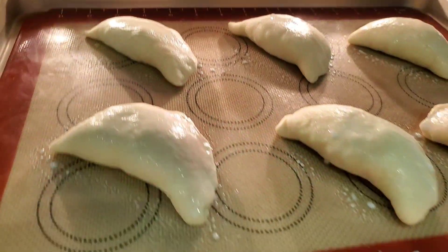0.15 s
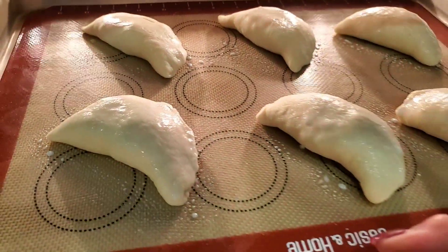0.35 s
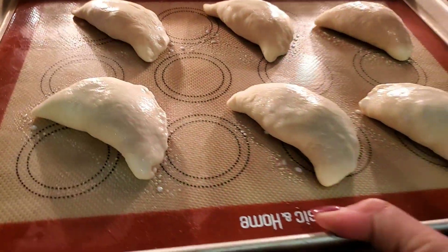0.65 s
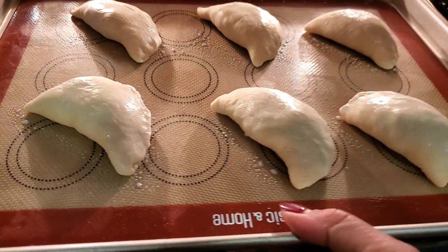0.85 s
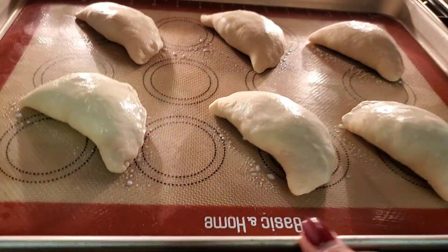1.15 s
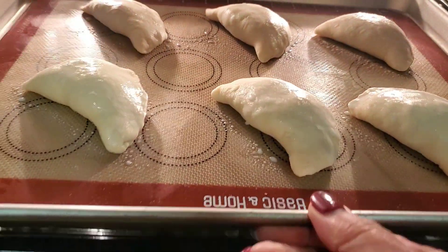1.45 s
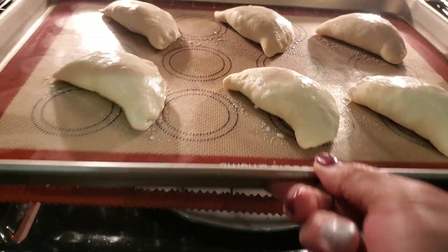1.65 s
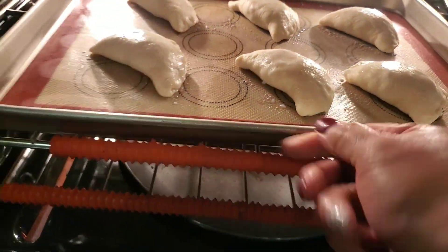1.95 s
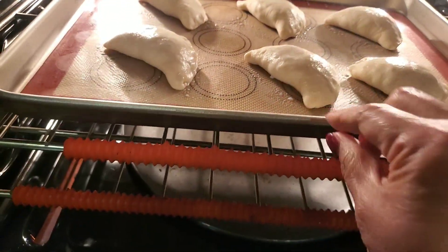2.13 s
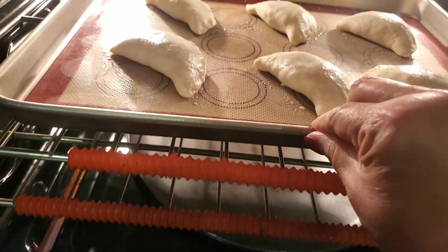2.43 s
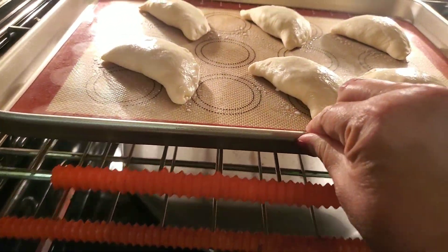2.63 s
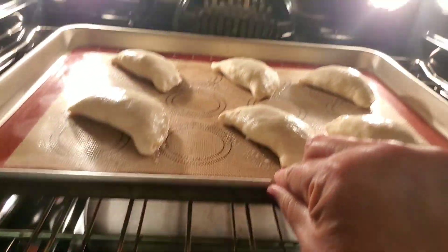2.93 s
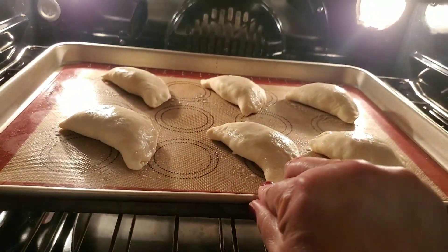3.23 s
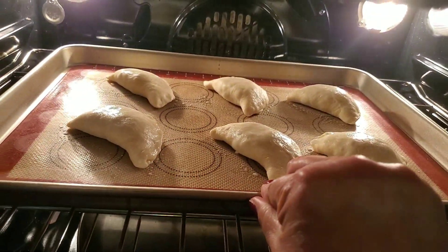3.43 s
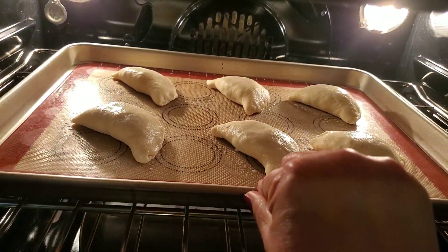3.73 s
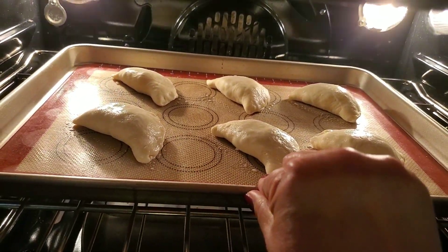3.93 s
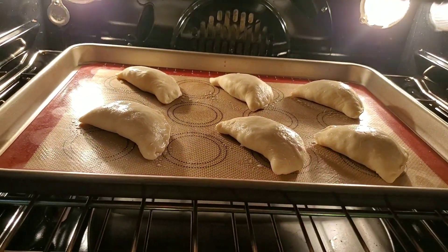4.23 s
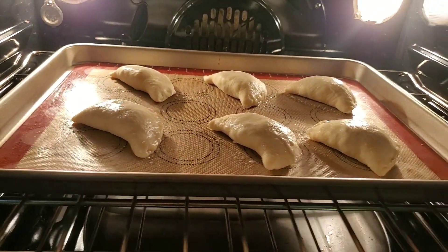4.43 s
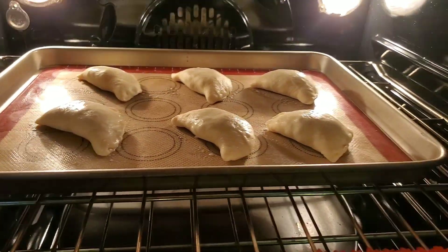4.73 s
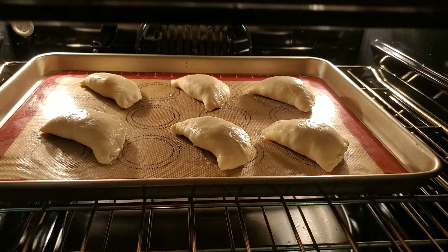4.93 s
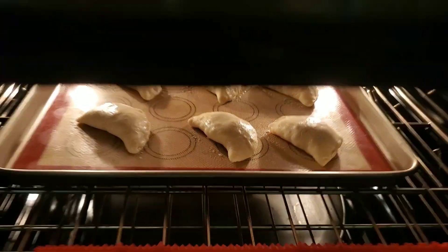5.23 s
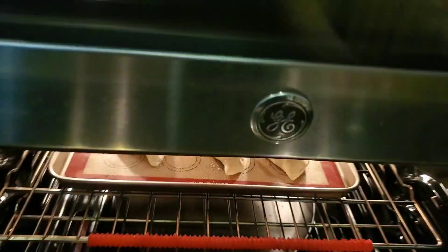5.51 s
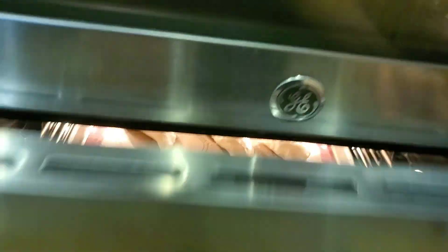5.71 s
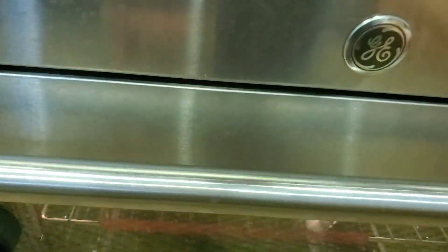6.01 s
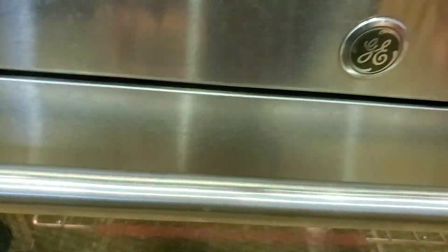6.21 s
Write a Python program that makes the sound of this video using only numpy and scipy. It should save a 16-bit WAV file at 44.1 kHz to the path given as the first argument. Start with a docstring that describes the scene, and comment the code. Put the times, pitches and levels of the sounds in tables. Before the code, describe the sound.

A close microphone at an oven's mouth in a small kitchen catches a steady low hum, rumbling air and a whirring fan leaning left. Right away a loaded metal baking sheet knocks the rack, and around 0.4 to 0.5 seconds it clatters loudly in a tight cluster of clanks that ring on with a wavering shimmer. Soft brushing, a faint rim squeak and dull nudges follow until 1.9. At 2.0 the sheet drops flat with a hard, bright clang, then paired wire ticks run from 2.1 to 2.7, with a dry click near 2.9. The drone dominates, broken by faint nudges at 3.7 and 4.7 and rack clicks around 4.9 to 5.0. Hinges knock at 5.4 and more strongly at 5.6, springs ringing. Near 6.0 the door slams with a heavy, overloaded thud and booming panels, rattles briefly, and settles in tiny hiss puffs over the muffled hum.

```python
"""An oven hums and whirrs throughout, its steady drone made of a sine, shaped noise and wavering noise bands.
A loaded baking sheet clatters onto the rack and drops flat: bursts of dense modes, with tuned modes ringing on.
It is pushed in with noise brushes, a squeak and paired wire ticks; then the rack clicks dryly.
The door's hinges knock and their springs ring; it shuts with a heavy thud over booming panels and settles in
puffs of hiss. A small kitchen answers the metal, and the loudest blows overload the close microphone."""
import sys
import numpy as np
from scipy import signal
from scipy.fft import rfft, irfft, next_fast_len
from scipy.io import wavfile
from scipy.ndimage import map_coordinates

SR = 44100
rng = np.random.default_rng(int(sys.argv[2]) if len(sys.argv) > 2 else 0)


def int16_out(signal):
    """Quantize to a 16-bit WAV file."""
    q = np.round(np.clip(np.atleast_2d(signal).T, -1, 1) * 32767)
    wavfile.write(sys.argv[1], SR, q.astype(np.int16))


N = 280828  # length of the scene in samples


def amp(db):
    """Decibels to amplitude."""
    return 10 ** (np.asarray(db) / 20)


def unit(x):
    """Scale to rms 1."""
    return x / np.sqrt(np.mean(x ** 2) + 1e-20)


def along(points, hz):
    """Read (frequency, value) points along a log frequency axis."""
    f, v = np.transpose(points)
    return np.interp(np.log(hz + 1), np.log(f + 1), v)


def curves(rows):
    """One value per sample for each column after the time."""
    s, *cols = np.transpose(rows)
    return [np.interp(np.arange(N) / SR, s, c) for c in cols]


def wobble(rate):
    """A smooth random curve with rate knots a second."""
    return map_coordinates(rng.standard_normal(1024), [np.arange(N) * rate / SR], mode="wrap")


def filtered(x, response):
    """Multiply the spectrum of x by a response of frequency."""
    n = x.shape[-1]
    m = next_fast_len(n + 2048, real=True)
    return irfft(rfft(x, m) * response(np.fft.rfftfreq(m, 1 / SR)), m)[..., :n]


def fade(x, decay):
    """Let each frequency of x die at its own speed."""
    hz, t, z = signal.stft(x, SR, nperseg=256)
    fall_db = -60 * t / along(decay, hz)[:, None]
    return signal.istft(z * amp(fall_db), SR, nperseg=256)[1][:, :x.shape[-1]]


def add(track, s, sound):
    """Lay a sound into a track at time s."""
    part = track[:, max(0, round(s * SR)):][:, :sound.shape[-1]]
    part += sound[:, :part.shape[-1]]


def swells(rows, rise_s, fall_s):
    """Envelope of strokes: each rises, holds to the end of its length, then falls 60 dB in fall_s."""
    t = np.arange(N) / SR
    total = 0
    for s, length, db in rows:
        rise = np.clip((t - s) / rise_s, 0, 1)
        since_end = np.maximum(t - s - length, 0)
        total = total + rise * amp(db - 60 * since_end / fall_s)
    return total


# stereo width of noise and ringing: (frequency [Hz], side minus mid [dB])
STEREO_WIDTH = [(60, -16.5), (200, -19.5), (380, -9), (700, -5), (1300, 1), (15000, 0)]


def noise(colour, size):
    """Stereo noise of rms 1: alike at both ears in the bass, unrelated in the treble."""
    def response(hz):
        side = amp(along(STEREO_WIDTH, hz))
        mid_and_side = np.array([np.ones_like(side), side]) / np.hypot(1, side)
        return amp(along(colour, hz)) * mid_and_side
    mid, side = filtered(rng.standard_normal((2, size)), response)
    return unit(np.array([mid + side, mid - side]))


def ring(modes, scatter_db, drift):
    """Struck modes, cut at one second: strengths vary by blow, loose contacts let each phase drift [rad/sqrt(s)]."""
    out = np.zeros((2, SR))
    chances = rng.standard_normal((len(modes), 3))
    walks = rng.standard_normal((len(modes), 128))
    for (hz, db, t60), chance, steps in zip(modes, chances, walks):
        t = np.arange(min(SR, int(t60 * SR))) / SR
        walk = np.interp(t, np.linspace(0, 1, len(steps)), np.cumsum(steps) / np.sqrt(len(steps)))
        # high modes reach the two ears out of step
        ears = 2 * amp(along(STEREO_WIDTH, hz)) * chance[1:, None]
        phase = (2 * np.pi * hz * t + drift * walk + ears).astype(np.float32)
        decay = np.exp(-np.log(1000) * t / t60)
        out[:, :len(t)] += amp(db + scatter_db * chance[0]) * decay * np.sin(phase)
    return out


def blows(hits, colour, decay, attack, clang_db, body_db, crack_db, snap_db, peaky_db):
    """Each contact excites its own crowd of close modes, with its own level and share of body and crack."""
    size = SR // 3
    track, t, hz = np.zeros((2, N)), np.arange(size) / SR, np.fft.rfftfreq(size, 1 / SR)
    body = 1 / (1 + (hz / 700) ** 6)
    crack = 1 - 1 / (1 + (hz / 3500) ** 6)
    clang = 1 - body - crack
    # direct sound stands above the oven's echoes
    snap = 1 + amp(snap_db - 60 * t / 0.018)
    onset = (1 - np.exp(-t / attack)) * snap
    for s, db, low, high in hits:
        # the point of contact favours some modes, least in the body
        favoured = np.interp(hz, np.linspace(0, SR / 2, 400), rng.standard_normal(400))
        spectrum = rfft(noise(colour, size=size)) * amp(peaky_db * favoured * (1.5 - body))
        parts = [(body, low + body_db), (clang, clang_db), (crack, high + crack_db)]
        crowd = sum(amp(db + level) * unit(irfft(spectrum * band, size)) for band, level in parts)
        add(track, s, fade(crowd, decay) * onset)
    return track


# decay of the kitchen: (frequency [Hz], t60 [s])
KITCHEN_DECAY = [(100, 0.63), (1000, 0.49), (4000, 0.51), (12000, 0.47)]


def kitchen(x):
    """The room's short diffuse tail: decaying noise convolved with the sound, 400 samples late."""
    tail = fade(rng.standard_normal((2, SR // 2)), KITCHEN_DECAY)
    late = np.pad(x, ((0, 0), (400, 0)))
    return signal.fftconvolve(late, tail / np.linalg.norm(tail[0]), axes=1)[:, :N]


# how near the microphone is to the oven's mouth: (time [s], gain [dB])
MIC_NEARNESS = [(0, 1), (1.25, -1.5), (2.6, -0.5), (3.2, 0), (4.4, 0.5), (5.4, -.5)]
# colours of the low rumble, the hollow air rush and the fan's whirr: (frequency [Hz], relative level per Hz [dB])
RUMBLE_COLOUR = [(13, -54), (22, -24), (55, -1), (91, -4), (114, 1), (134, -13), (146, -22.5), (200, -19.5),
                 (260, -60), (440, -120)]
AIR_COLOUR = [(82, -13), (140, -5.5), (146, -12), (301, -9.5), (329, -23), (359, -7), (389, -15.5),
              (665, -15), (1500, -32.5), (1950, -85), (3300, -120)]
WHIRR_COLOUR = [(760, -43), (1300, -7), (1700, -5), (2100, -5.5), (2700, -13.5), (3300, -9.5), (3700, -11),
                (6600, -7), (7700, -15), (9280, -5.5), (12000, -11), (15400, -17)]
# wavering resonances of the whirr: (frequency [Hz], bandwidth [Hz], relative level [dB])
FAN_RESONANCES = [(1664, 51, 0), (2463, 186, -4.5), (2760, 400, -6), (3165, 162, -8.5), (5900, 60, -5),
                  (6620, 190, -6)]
HUM_HZ = 120
RUMBLE_DB, AIR_DB, WHIRR_DB, HUM_DB = -40, -46.5, -52, -39.5
HUM_GROWS = 3.4  # the hum stands in the cavity, so it gains this many times the nearness in dB
CLOSING_S, CLOSED_S = 5.6, 5.77  # the door covers the oven's mouth
SHUT_WHIRR_DB, SHUT_HUM_DB = -5.5, -11  # what the closed door takes off


def oven():
    """The motor hums at twice the mains rate; air rumbles and whirrs, and the door muffles hum and whirr."""
    near_db, = curves(MIC_NEARNESS)
    shut, = curves([(CLOSING_S, 0), (CLOSED_S, 1)])
    white, cavity = rng.standard_normal((2, N)), np.zeros((2, N))
    for hz, width, db in FAN_RESONANCES:
        band = filtered(white, lambda f: 1 / (1 + (2 * (f - hz) / width) ** 2))
        cavity += amp(db + 1.55 * wobble(18)) * band
    whirr = noise(WHIRR_COLOUR, size=N) + amp(-1.5) * unit(cavity)
    whirr = amp(WHIRR_DB + SHUT_WHIRR_DB * shut) * whirr
    hum_db = HUM_DB + HUM_GROWS * near_db + SHUT_HUM_DB * shut + 1.72 * wobble(5.22)
    hum = amp(hum_db) * np.sin(2 * np.pi * HUM_HZ * np.arange(N) / SR + .1 * wobble(5.5))
    air = amp(AIR_DB + 0.2 * wobble(4.4)) * noise(AIR_COLOUR, size=N)
    rumble = amp(RUMBLE_DB + 1.3 * wobble(3.18)) * noise(RUMBLE_COLOUR, size=N)
    return hum + amp(near_db) * (air + whirr) + rumble


# the rack and the door in motion: (start [s], length [s], level [dB])
MOTIONS = [(0, .75, -37), (2.05, 0.65, -46.5), (5.62, 0.24, -36.5)]


def handling():
    """A low rumble with a hollow rush above it while the rack or the door moves, dying away after."""
    rush = noise(RUMBLE_COLOUR, size=N) + amp(-4.0) * noise(AIR_COLOUR, size=N)
    return swells(MOTIONS, rise_s=0.051, fall_s=0.7) * rush


# pushes that set the oven's panels booming: (time [s], level [dB])
PANEL_PUSHES = [(0.036, -26.5), (0.227, -20.5), (0.47, -35), (2.02, -24), (2.19, -27), (5.405, -29.5),
                (5.6, -15.5), (5.73, -24), (5.82, -30), (5.961, -8), (5.988, -6)]
# boom of the panels: (frequency [Hz], relative level [dB], t60 [s])
PANEL_RING = [(70, -2.5, 0.44), (85.4, 0.5, 0.23), (103, -3, 0.096), (131.4, -10.5, 0.23),
              (175.5, -10.5, 0.32), (227.7, -19.5, 0.58), (314.7, -16.5, 0.21)]
REBOUND_S, REBOUND_DB = .033, -2.5  # a pushed panel springs back once
SHUDDER_DB, SHUDDER_T60_S = -14, 1  # the whole cabinet shudders


def panels():
    """The big steel panels boom at each push, spring back once and shudder with the cabinet."""
    track, t = np.zeros((2, N)), np.arange(SR) / SR
    for s, db in PANEL_PUSHES:
        for late, change_db in [(0, 0), (REBOUND_S, REBOUND_DB)]:
            boom = ring(PANEL_RING, scatter_db=1.5, drift=4.1) * (1 - np.exp(-t / 0.0051))
            add(track, s + late, amp(db + change_db) * boom)
        shudder = noise(RUMBLE_COLOUR, size=SR) * (1 - np.exp(-t / 0.027))
        add(track, s, amp(db + SHUDDER_DB - 60 * t / SHUDDER_T60_S) * shudder)
    return track


# ring of the hinge springs: (frequency [Hz], relative level [dB], t60 [s])
SPRING_RING = [(305, -1, .13), (371, -1, .15), (480, -4, .13), (1335, -12, .2), (2455, -19, 1.0),
               (3117, -19, .25), (3537, -12, .22), (4215, -19, .2), (5200, -22, .25), (6864, -21, .3)]


def springs(hits, reach_db):
    """The hinge springs ring in proportion to each blow."""
    track = np.zeros((2, N))
    for s, db, _, _ in hits:
        add(track, s, amp(db + reach_db) * ring(SPRING_RING, scatter_db=1, drift=16))
    return track


# dry clicks of the rack in its runners, then knocks of the door's hinges:
# (time [s], level [dB], body trim [dB], crack trim [dB])
RACK_CLICKS = [(2.862, -24, -1.5, 0.5), (4.919, -25, -2.5, 0.5), (5.021, -37.5, 13, -16),
               (5.031, -30, 3, -2.5)]
HINGE_KNOCKS = [(5.373, -26, 9.5, -5.5), (5.391, -33, 8, -9), (5.587, -25, 4, -11), (5.595, -14, 5, -5),
                (5.606, -22, 0, 4)]
# colour of both: (frequency [Hz], relative level per Hz [dB])
HINGE_COLOUR = [(88, -28), (150, -23), (330, -4.5), (500, -14), (900, -19.5), (1400, -17.5), (2590, -14),
                (3600, -18), (6500, -24), (8500, -29), (13000, -32.5), (15400, -30.5)]
# decay of their crowded modes: (frequency [Hz], t60 [s])
HINGE_DECAY = [(300, 0.2), (2000, 0.15), (12000, 0.039)]


def hinges():
    """The rack clicks dryly; the door's hinges knock and leave their springs ringing."""
    track = blows(RACK_CLICKS + HINGE_KNOCKS, HINGE_COLOUR, HINGE_DECAY, attack=0.0013, clang_db=-5.0,
                  body_db=-3.5, crack_db=-1.0, snap_db=4, peaky_db=4.5)
    return track + springs(HINGE_KNOCKS, reach_db=-11)


# the door meets its frame and rattles: (time [s], level [dB], body trim [dB], crack trim [dB])
DOOR_BLOWS = [(5.933, -14.5, -17, 4), (5.978, 1.5, -14, -11.5), (5.998, -20, 0.5, -30),
              (6.026, -11, -7, -14), (6.044, -27.5, 5.5, -11)]
# colour of the door's blows: (frequency [Hz], relative level per Hz [dB])
DOOR_TONE = [(59, -27), (100, -17), (160, -13), (330, -2.5), (480, -10.5), (750, -15), (1150, -10),
             (1800, -14.5), (2700, -15.5), (4300, -20.5), (7000, -26), (13000, -39), (15400, -34.5)]
# decay of the door's crowded modes: (frequency [Hz], t60 [s])
DOOR_FALL = [(200, 0.44), (1200, 0.14), (4000, 0.084), (12000, 0.07)]
# thin puffs of hiss as the shut door settles: (start [s], length [s], level [dB])
SETTLE_PUFFS = [(6.095, 0.059, -45.5), (6.175, 0.021, -42), (6.25, .016, -41.5)]
# colour of the puffs: (frequency [Hz], relative level per Hz [dB])
PUFF_COLOUR = [(1000, -39.5), (3000, 1.5), (6000, -10), (6900, 7.5), (8000, -8), (11000, -6), (14000, 2),
               (15500, -5)]


def door():
    """The door touches, slams and rattles in its frame, shakes the springs, then settles in puffs of noise."""
    track = blows(DOOR_BLOWS, DOOR_TONE, DOOR_FALL, attack=0.0004, clang_db=-6.0,
                  body_db=-4, crack_db=-4.0, snap_db=-8, peaky_db=2.5)
    track += springs(DOOR_BLOWS, reach_db=-22)
    puffs = swells(SETTLE_PUFFS, rise_s=0.015, fall_s=0.12) * amp(1.58 * wobble(90))
    return track + puffs * noise(PUFF_COLOUR, size=N)


# strokes of the sheet and the hand brushing along: (start [s], length [s], level [dB])
BRUSH_STROKES = [(.26, .2, -37.5), (.98, 0.056, -43), (1.48, 0.37, -44.5), (1.88, 0.16, -40),
                 (2.58, 0.29, -48)]
# the rim squeaks faintly on a wire: (start [s], length [s], level [dB])
RIM_SQUEAKS = [(1.3, 0.023, -44), (1.89, .1, -41)]
# colours of brush and squeak: (frequency [Hz], relative level per Hz [dB])
BRUSH_TONE = [(240, -60), (550, -6), (1900, -4), (3190, -8.5), (4200, -9), (7000, -12), (8500, -19),
              (13500, -17.5), (15400, -27)]
SQUEAK_TONE = [(2300, -35), (2950, -11), (3100, 3), (3300, -11), (4500, -26)]
# the sheet ticks on and off a rack wire: (time [s], level [dB], gap to second tick [s], second re first [dB])
WIRE_TICKS = [(2.132, -19, .053, -5), (2.299, -27.5, 0.051, 1.5), (2.470, -29.5, 0.045, 2),
              (2.579, -26, .044, 2), (2.696, -30.5, .05, -12)]
# the sheet nudges the rack, softly and dully: (time [s], level [dB])
RACK_NUDGES = [(1.58, -28), (1.835, -29), (3.66, -33), (4.74, -34)]
# colour of ticks and nudges: (frequency [Hz], relative level per Hz [dB])
SLIP_TONE = [(88, -36), (150, -14), (189, 3), (326, -7.5), (373, 2.5), (826, -6.5), (1130, -9),
             (2440, -15.5), (3400, -24.5), (4050, -20.5), (15400, -57.5)]
# decay of their crowded modes: (frequency [Hz], t60 [s])
SLIP_FALL = [(300, 0.32), (2000, 0.11), (5000, 0.13), (13000, 0.042)]
TICK_BODY_DB, TICK_CRACK_DB = -4.5, -6  # trims of body and crack
NUDGE_BODY_DB, NUDGE_CRACK_DB = -9, -37


def sliding():
    """The sheet brushes and squeaks as shaped noise, nudges the rack, and ticks twice over each wire."""
    contacts = []
    for s, db, gap, off_db in WIRE_TICKS:
        contacts.append((s, db, TICK_BODY_DB, TICK_CRACK_DB))
        contacts.append((s + gap, db + off_db, TICK_BODY_DB, TICK_CRACK_DB))
    contacts += [(s, db, NUDGE_BODY_DB, NUDGE_CRACK_DB) for s, db in RACK_NUDGES]
    slips = blows(contacts, SLIP_TONE, SLIP_FALL, attack=0.0012, clang_db=-11.5,
                  body_db=-7, crack_db=0.0, snap_db=-3.5, peaky_db=3.0)
    squeak = swells(RIM_SQUEAKS, rise_s=0.034, fall_s=.08) * amp(1.8 * wobble(49.7))
    squeak = squeak * noise(SQUEAK_TONE, size=N)
    brush = swells(BRUSH_STROKES, rise_s=0.051, fall_s=0.33) * amp(2.1 * wobble(70))
    brush = brush * noise(BRUSH_TONE, size=N)
    return slips + squeak + brush


# the sheet's rim strikes the rack:
# (time [s], level [dB], body trim [dB], crack trim [dB], rock back re strike [dB])
RIM_STRIKES = [(0.005, -9, -7.5, -31, -15), (0.205, -22, -7.5, -23, 2.5), (0.42, -3, -9.5, -1.5, -2.5),
               (0.473, -7, -16, -3.5, -6), (0.483, -9.5, -5.5, 4, 3), (0.519, -6, -11.5, -9.5, -6),
               (0.731, -31, -11, -7.5, -6)]
# the sheet drops flat: (time [s], level [dB], body trim [dB], crack trim [dB])
FLAT_DROP = [(2.003, 0.5, -7, -10.5), (2.017, -2, -22, -11)]
# colours of strikes and drop: (frequency [Hz], relative level per Hz [dB])
STRIKE_COLOUR = [(35, -45), (70, -16), (110, 9.5), (180, 2), (270, 2), (450, -4.5), (720, 1.5), (1100, -6),
                 (1500, 1), (2500, -6.5), (4000, -14), (7000, -19.5), (9000, -28), (13000, -23),
                 (15400, -35.5)]
FLAT_COLOUR = [(40, -25), (110, -14), (190, 1), (300, -10.5), (470, 6), (600, -4), (1000, -1), (1700, -7.5),
               (2300, -13), (3000, -4), (3600, -9), (7000, -15.5), (9000, -22.5), (13000, -27.5),
               (15400, -24)]
# decay of their crowded modes: (frequency [Hz], t60 [s])
STRIKE_DECAY = [(150, 0.33), (700, 0.31), (2000, 0.23), (5000, 0.2), (13000, 0.15)]
FLAT_DECAY = [(150, 0.36), (700, 0.18), (2000, 0.21), (5000, 0.11), (13000, 0.17)]
# ring of sheet and rack; the rack's near-equal wires beat in clusters:
# (frequency [Hz], relative level [dB], t60 [s])
TRAY_RING = [(109.9, -2, 0.81), (188.6, -5, 0.55), (402, -3.5, 0.51), (502.5, -2.5, 0.23),
             (639, -2.5, 0.58), (695, -0.5, 0.63), (782, -13.5, 2.15), (820, -8, 1), (835, -20, 3.66),
             (838, -10.5, 1.7), (886, -20.5, 1.4), (1050, -4.5, 0.48), (1272, -7, 0.24), (1306, -27, 0.31),
             (1370, -9, 0.21), (1570, -4, 0.13), (2000, -2.5, 0.4), (2024, -5, 0.46), (2190, -8, 0.77),
             (2186, -9.5, 1.02), (2277, -8.5, 1.03), (2386, -12.5, 0.87), (2530, -3.5, 0.38),
             (3010, -22, 0.65), (3060, -11, 0.093), (3840, -28, 0.16), (3930, -16, 0.21), (4480, -15, 0.86),
             (4480, -11, 0.3), (5700, -6, 0.27)]
ROCK_S, ROCK_BODY_DB, ROCK_CRACK_DB = .019, 3, -5.5  # the rim rocks back and lands again, duller
TILT_ABOVE_HZ = 2500  # the crack trim also tilts the ringing modes above this


def tray():
    """The sheet clatters on the rack, rocking back after each strike, then drops flat; strong modes ring on."""
    contacts = []
    for s, db, body, crack, rock in RIM_STRIKES:
        contacts.append((s, db, body, crack))
        contacts.append((s + ROCK_S, db + rock, body + ROCK_BODY_DB, crack + ROCK_CRACK_DB))
    track = blows(contacts, STRIKE_COLOUR, STRIKE_DECAY, attack=0.00058, clang_db=-8.5,
                  body_db=-6, crack_db=-1, snap_db=-2.0, peaky_db=4.0)
    track += blows(FLAT_DROP, FLAT_COLOUR, FLAT_DECAY, attack=0.00093, clang_db=-6.5,
                   body_db=-6.0, crack_db=-1.5, snap_db=-1.5, peaky_db=3)
    for s, db, _, crack in contacts:
        tilted = []
        for hz, level, t60 in TRAY_RING:
            octaves_above = max(0, np.log2(hz / TILT_ABOVE_HZ))
            tilted.append((hz, level + .4 * crack * octaves_above, t60))
        add(track, s, amp(db - 20) * ring(tilted, scatter_db=1.5, drift=7.97))
    for s, db, _, _ in FLAT_DROP:  # lying flat, the sheet damps the wires: a weaker ring
        add(track, s, amp(db - 23.0) * ring(TRAY_RING, scatter_db=0, drift=10.65))
    return track


def lean(x, balance):
    """Tilt each frequency to the left or right."""
    return filtered(x, lambda hz: amp(np.outer([.5, -.5], along(balance, hz))))


# stereo balance of the metal and of the oven: (frequency [Hz], left minus right [dB])
METAL_LEAN = [(100, 0), (380, 0), (700, 3.5), (1300, 5.5), (2380, 8.5), (4400, 1.5), (8100, 2), (15000, 2)]
OVEN_LEAN = [(100, 2), (380, -.5), (700, 1), (1290, 8), (2380, 12), (4390, 7), (8100, 1.5), (15000, 5)]


def scene():
    """Metal sounds in the kitchen over the oven's boom and drone; the fan lies well to the left."""
    metal = tray() + sliding() + hinges() + door()
    in_room = lean(metal + amp(-16.0) * kitchen(metal), METAL_LEAN)
    return in_room + panels() + handling() + lean(oven(), OVEN_LEAN)


TOP_HZ = 15569  # band limit


def record(dry):
    """The loudest peaks are rounded off at full scale; the deepest bass and all above the band limit are lost."""
    clipped = dry / (1 + np.abs(dry) ** 4) ** (1 / 4)

    def response(hz):
        bass_cut = hz ** 2 / np.hypot(hz ** 2, 28 ** 2)
        return bass_cut / (1 + (hz / TOP_HZ) ** 160)
    return filtered(clipped, response)


dry = scene()
out = record(dry)
int16_out(out)
```